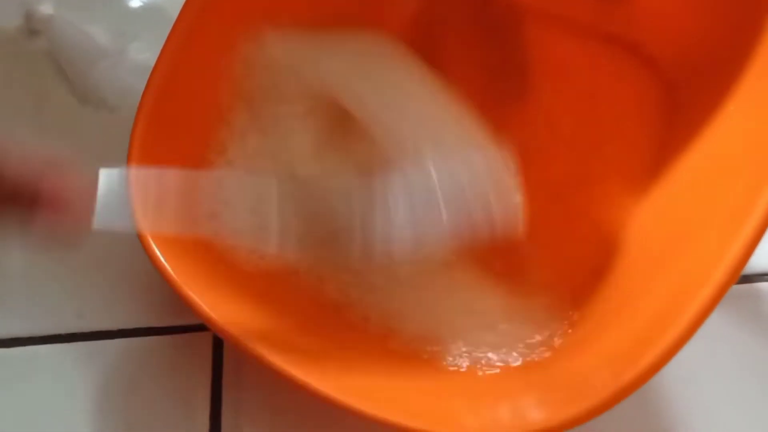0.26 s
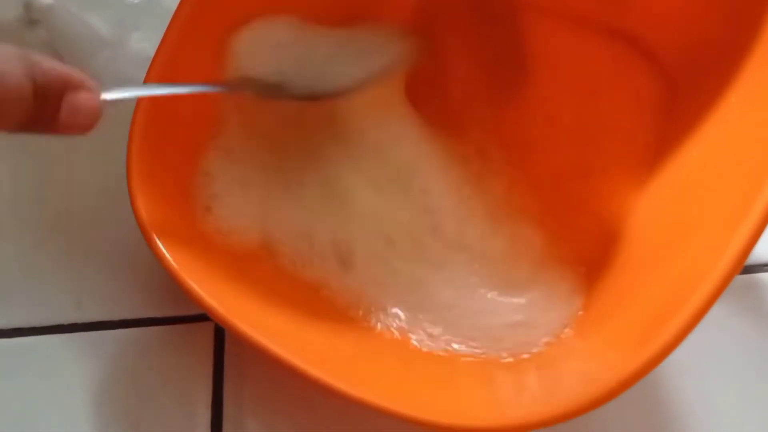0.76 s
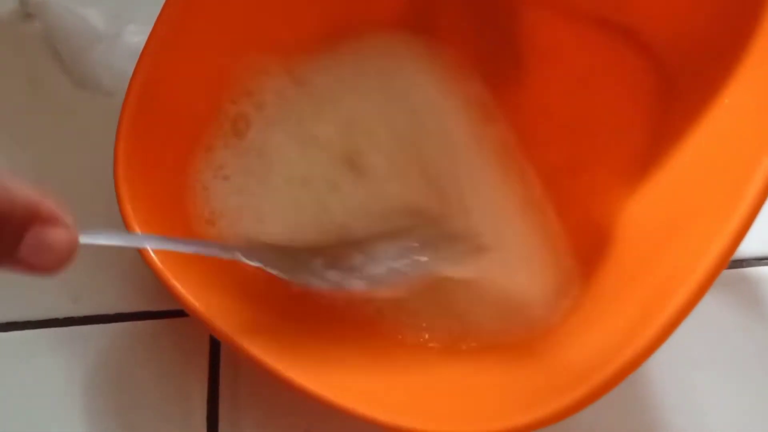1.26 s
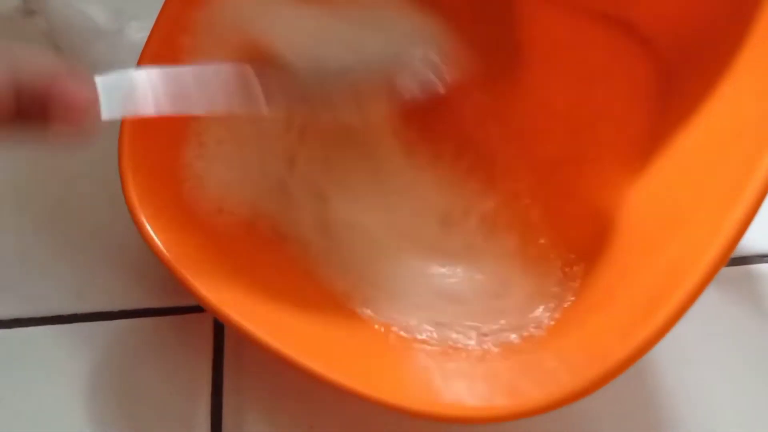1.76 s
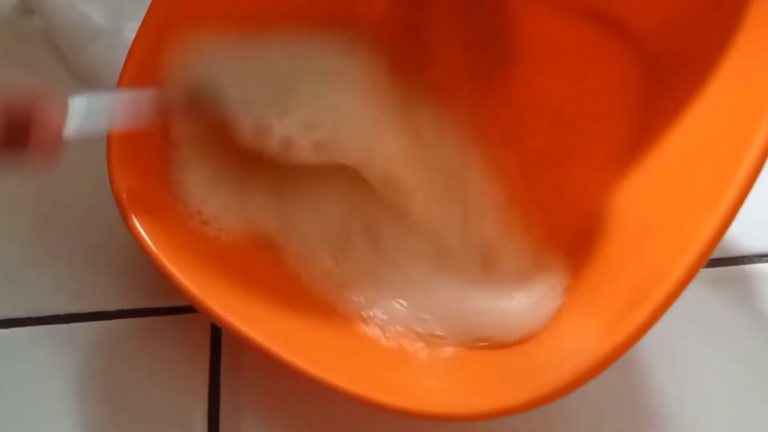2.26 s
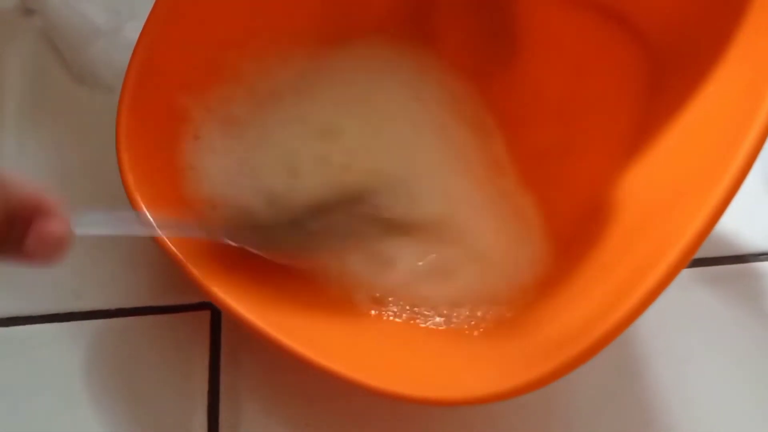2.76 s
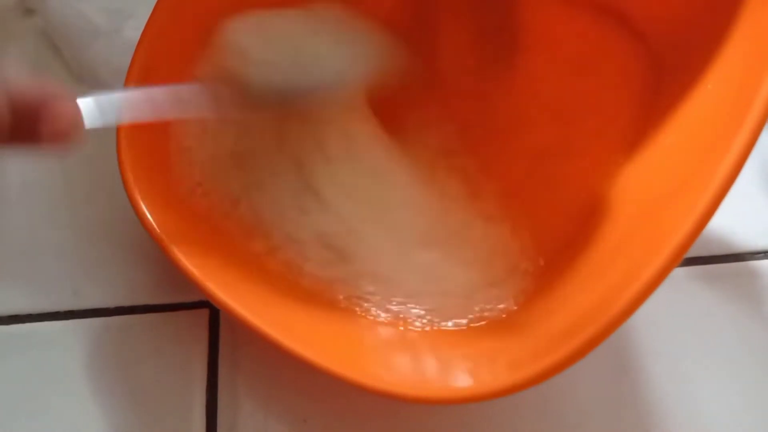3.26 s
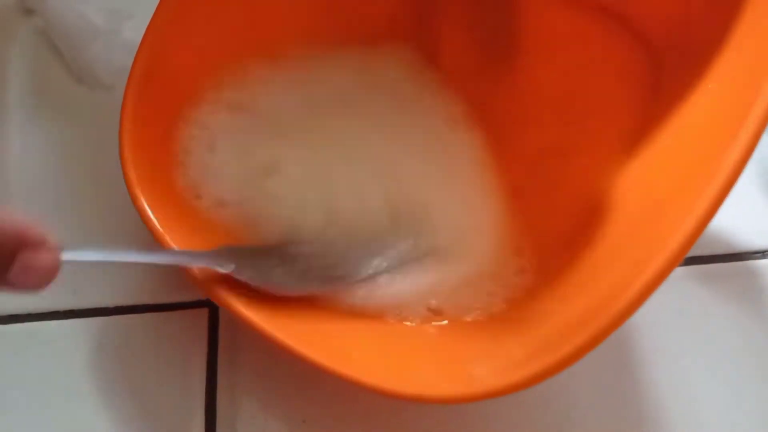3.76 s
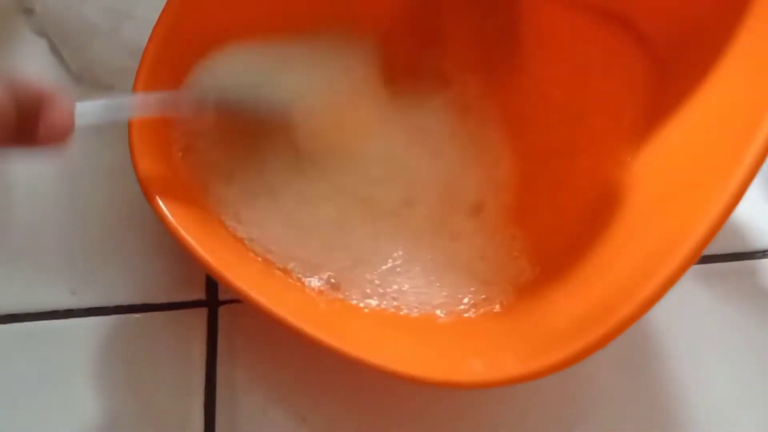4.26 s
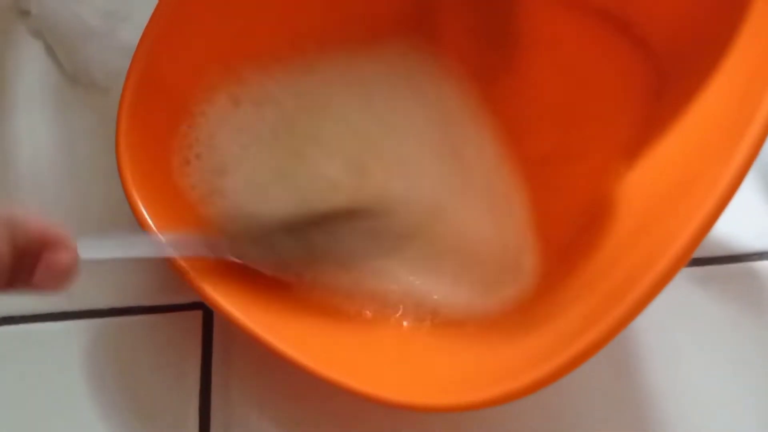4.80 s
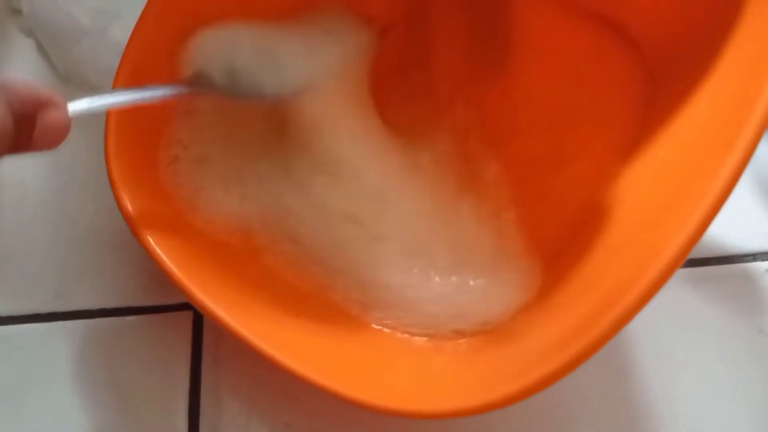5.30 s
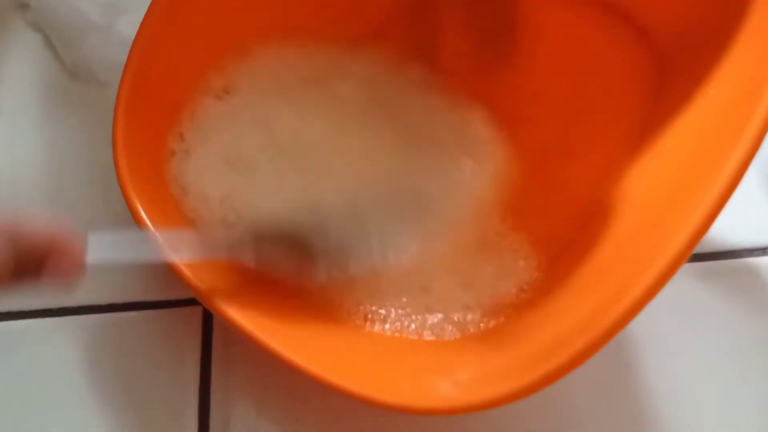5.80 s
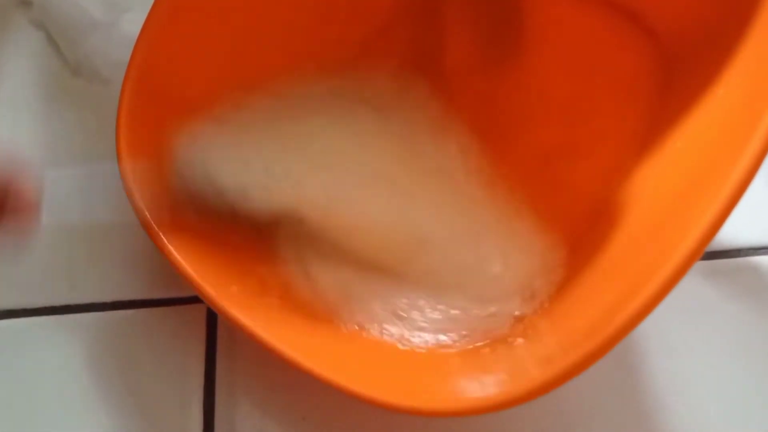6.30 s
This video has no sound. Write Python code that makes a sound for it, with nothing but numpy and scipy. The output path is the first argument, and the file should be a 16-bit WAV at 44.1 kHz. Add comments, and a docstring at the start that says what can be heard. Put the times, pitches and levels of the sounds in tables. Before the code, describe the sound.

A metal fork rapidly whisks thin batter in a plastic bowl, clacking, scraping and squeaking about five times a second over a faint hum.

```python
"""In a small tiled kitchen, a fork whisks thin batter in a tilted plastic bowl, about five strokes a second.
Blows and bounces excite the modes of wall and tines; dragging tines scrape by random catches and squeaking slips.
Batter closes air pockets with plops and spray, and froth bubbles burst as rising chirps.
Sparse decaying echoes follow over an appliance's filtered-noise rumble, wavering hum and two faint gliding tones.
Heard close up, with little deep bass and hardly any of the highest treble."""
import sys
import numpy as np
from scipy import signal
from scipy.io import wavfile
from scipy.ndimage import uniform_filter1d

SR = 44100
rng = np.random.default_rng(int(sys.argv[2]) if len(sys.argv) > 2 else 0)


def master_out(mix):
    """Clip the mix to full scale and print it as 16-bit PCM to the path in sys.argv[1]."""
    frames = np.transpose(np.atleast_2d(mix))
    ceiling = np.clip(frames, -1, 1)
    pcm = np.round(ceiling * 32767).astype(np.int16)
    wavfile.write(sys.argv[1], SR, pcm)


N = 288414

# modes of the bowl's wall, nominal before detuning and damping: (f/Hz, relative level/dB, t60/s)
WALL_MODES = [(306, -28, 0.026), (891, -13.5, 0.017), (1150, -3, .02), (1527, 1, 0.0086),
              (1702, -3.5, 0.013), (2014, -14, 0.034)]


def knock(peak_db, chance):
    """Modal excitation: the spot struck shifts pitch and balance; the resting tines damp the wall."""
    count = len(WALL_MODES)
    detune = 1 + 0.032 * chance[:count, None]
    modes = [(hz, db + 0.37 * c, t60) for (hz, db, t60), c in zip(WALL_MODES, chance[count:])]
    contact = signal.windows.hann(13)  # the blow is a short soft push
    return gain_of(peak_db) * peaked(np.convolve(ring(modes, detune, damping=1.0), contact))


# modes of the tines and the rim under them, nominal as above: (f/Hz, relative level/dB, t60/s)
TINE_MODES = [(2346, -30, 0.13), (2934, -16, 0.048), (3473, -9.5, 0.015), (3917, -5.5, 0.011),
              (4965, 1.5, 0.0066), (5740, 1.5, 0.0061), (6680, 0.5, 0.0091), (7287, 2, 0.0066),
              (8840, -5.5, 0.0035), (10320, -11, 0.0025), (13400, -18, 0.003), (15600, -11, 0.0038)]
# strokes: (t/s, wall knock peak level/dB, tine tick peak level/dB, relative drag level/dB, time to lift-off/s)
STROKES = [(0.0, -22.5, -21.5, -32.5, 0.058), (0.1664, -10.5, -13.5, -33, 0.077),
           (0.3437, -16, -13, -46, 0.062), (0.5345, -13, -13.5, -35.5, 0.069),
           (0.7168, -10, -13, -35.5, 0.084), (0.895, -11, -12.5, -34, 0.059),
           (1.0949, -11, -14, -31.5, 0.065), (1.29, -10.5, -12, -31, 0.076),
           (1.4772, -11.5, -12.5, -37.5, 0.09), (1.6707, -13, -8, -37, 0.09),
           (1.864, -14, -10.5, -35.5, 0.079), (2.0522, -14, -13.5, -33, 0.066),
           (2.24, -12, -10.5, -33.5, 0.084), (2.4256, -11.5, -13, -29.5, 0.047),
           (2.6046, -10.5, -12.5, -35.5, .098), (2.7979, -11, -13, -38.5, 0.098),
           (2.9936, -14, -16, -38, 0.068), (3.1817, -20, -20.5, -41, 0.073),
           (3.3915, -16, -16.5, -39.5, 0.088), (3.5917, -17.5, -13.5, -37.5, 0.073),
           (3.7872, -24, -9.5, -34, 0.076), (3.9918, -18.5, -17.5, -45.5, 0.05),
           (4.1838, -22.5, -19.5, -47.5, 0.13), (4.4016, -15, -16, -37, 0.056),
           (4.602, -15, -15.5, -34.5, 0.083), (4.82, -14, -19.5, -28, 0.06),
           (5.0036, -16.5, -20, -40.5, 0.11), (5.2283, -19, -19, -36.5, 0.12),
           (5.447, -22.5, -20.5, -40, .11), (5.6679, -22, -21, -39, 0.09),
           (5.8811, -26.5, -19.5, -54, 0.049), (6.0841, -35, -25.5, -37.5, 0.086),
           (6.2832, -49, -20.5, -26.5, 0.032), (6.4789, -16, -15, -26, 0.056)]
# bounces of the fork on the wall: (t/s, peak level/dB)
BOUNCES = [(0.0065, -26.5), (0.3652, -31), (0.554, -27), (0.736, -36), (1.1005, -18), (1.3085, -29),
           (1.6992, -25), (1.8795, -21), (2.2515, -23.5), (2.4442, -35), (2.8153, -30), (3.0315, -35),
           (3.2065, -30.5), (3.413, -29), (3.6265, -29.8), (3.8006, -23.5), (4.0548, -29.5), (4.2284, -30),
           (4.4193, -30), (4.841, -24.5), (5.026, -31), (5.039, -33), (5.2804, -34), (5.485, -32),
           (5.8986, -35), (6.3039, -30.5)]


def blows():
    """Impact excitation: a wall knock, and a tick from random clicks of metal within milliseconds."""
    out, t = np.zeros(N), np.arange(300) / SR
    count = 2 * len(WALL_MODES)
    chances = rng.standard_normal((len(STROKES), count + 300))
    for (s, wall_db, tick_db, *_), chance in zip(STROKES, chances):
        add(out, s, knock(wall_db, chance[:count]))
        clicks = chance[count:]
        decay = gain_of(-60 * t / .014) * np.clip(t / .0004, 0, 1)
        landing = clicks * (abs(clicks) > 1.3) * decay
        tick = peaked(np.convolve(landing, ring(TINE_MODES, damping=1.68)))
        add(out, s - .0002, gain_of(tick_db) * tick)
    for (s, db), chance in zip(BOUNCES, rng.standard_normal((len(BOUNCES), count))):
        add(out, s, knock(db, chance))
    return out


def grit(size, per_s=9000, spread_db=4.0):
    """Asperity contact: tiny catches of steel on plastic as random clicks, a few of them large."""
    height = gain_of(spread_db * np.minimum(rng.exponential(1, size), 4))
    height = height * rng.choice([-1, 1], size)
    return evened(height * (rng.random(size) < per_s / SR))


def rubbed(force, modes, patchy_db=5.5):
    """Friction excitation: the contact wanders, so each mode has its own catches and comes and goes."""
    out = np.zeros(N)
    energy = np.array([gain_of(2 * db) * t60 for _, db, t60 in modes])
    for mode, share in zip(modes, np.sqrt(energy / energy.sum())):
        wander = gain_of(patchy_db * evened(uniform_filter1d(rng.standard_normal(N), 450)))
        catches = evened(wander * grit(N))
        out += share * signal.oaconvolve(force * catches, ring([mode]))[:N]
    return out


# slips of the dragging tines: (t/s, relative push level/dB, length/s, nominal squeak f/Hz)
SLIPS = [(0.191, -36, .017, 7100), (0.336, -35, 0.07, 7300), (0.397, -30.5, 0.024, 6980),
         (0.548, -33.5, 0.017, 7200), (0.588, -31.5, 0.016, 4680), (0.724, -37, .048, 6800),
         (0.765, -35.5, 0.014, 4700), (0.915, -35, 0.012, 5230), (0.94, -35, 0.042, 6940),
         (1.153, -30.5, 0.016, 7020), (1.322, -25.5, 0.015, 6200), (1.485, -31, 0.02, 7100),
         (1.512, -34, 0.019, 5000), (1.533, -32.5, 0.021, 7000), (1.686, -38, 0.018, 4800),
         (1.705, -28.5, 0.027, 5200), (1.7335, -29.5, .017, 4900), (1.9063, -31.5, 0.021, 6440),
         (1.9257, -31, 0.03, 6860), (2.088, -27.5, 0.032, 5930), (2.112, -28, .022, 6780),
         (2.2697, -23.5, 0.02, 5730), (2.45, -27, 0.041, 6070), (2.492, -34, 0.017, 5370),
         (2.623, -23.5, 0.025, 5740), (2.672, -36.5, 0.026, 5460), (2.8153, -26, 0.03, 5550),
         (2.857, -31.5, 0.027, 6800), (3.0223, -28, 0.028, 5320), (3.0623, -32, 0.031, 6950),
         (3.08, -38, .011, 7000), (3.2364, -32.5, .046, 6800), (3.4393, -35.5, 0.037, 6630),
         (3.622, -26, 0.039, 5650), (3.813, -34, 0.04, 5150), (4.017, -29, 0.048, 5440),
         (4.07, -38, 0.017, 6880), (4.226, -30, 0.029, 5170), (4.254, -46, 0.014, 4700),
         (4.444, -31.5, 0.028, 3320), (4.4697, -32.5, 0.021, 5440), (4.479, -34, 0.0068, 3050),
         (4.638, -29, 0.024, 3590), (4.6795, -28, 0.019, 5630), (4.871, -31.5, 0.012, 6350),
         (4.89, -38, 0.018, 6640), (5.043, -27.5, 0.038, 6270), (5.104, -34.5, 0.018, 6920),
         (5.264, -25, 0.037, 6680), (5.4752, -24.5, 0.039, 5470), (5.508, -29.5, 0.014, 6040),
         (5.692, -29, .049, 5870), (5.899, -28, 0.032, 5840), (5.92, -32.5, 0.029, 6450),
         (5.94, -27, .014, 5900), (6.098, -27, 0.0085, 4770), (6.1123, -27.5, 0.035, 5820),
         (6.127, -24, .012, 5830), (6.2966, -32, 0.066, 6870), (6.3, -28, .02, 4830)]
# drifting colour of the scrape: (t/s, lower tine modes level/dB, upper tine modes level/dB), against the middle
COLOUR = [(0, -6.5, -17), (.6, -27, -19), (1.3, -8.5, -25), (2.2, -19, -19), (3.0, -6, -15.5),
          (3.8, -10.5, -16.5), (4.8, -7, -14), (5.3, -30, -14.5), (6.5, -21, -14)]
# wall chatter: relative dB for a full-scale knock, share of the knock's dB followed, t60 in s, drift in dB/s
CHATTER_DB, CHATTER_SHARE, CHATTER_T60, CHATTER_DB_PER_S = -35.5, 0.24, 0.2, 0.34
SLIP_RISE, SLIP_FADE_DB, SLIP_END_S = .38, 10, 0.0085  # share of length rising, dB lost over length, let-go
TINES_LOW_HZ = 890  # tines and bubbles sound only above this


def scrape():
    """Stick-slip friction: catches ring the tines, the wall chatters after each blow, each slip squeaks."""
    drag, slip, chatter, squeak = np.zeros((4, N))
    catches = grit(N)
    for s, wall_db, _, drag_db, lift in STROKES:
        t = np.arange(0, lift, 1 / SR)
        touch = np.clip(t / 0.0019, 0, 1) * np.clip((lift - t) / 0.015, 0, 1)
        add(drag, s, gain_of(drag_db) * touch)
        chatter_db = CHATTER_DB + CHATTER_SHARE * wall_db + CHATTER_DB_PER_S * s - 60 * t / CHATTER_T60
        add(chatter, s, gain_of(chatter_db) * touch)
    for s, db, length, hz in SLIPS:
        t = np.arange(0, length, 1 / SR)
        edges = np.clip(t / (SLIP_RISE * length), 0, 1) * np.clip((length - t) / SLIP_END_S, 0, 1)
        push = gain_of(db - SLIP_FADE_DB * (t / length - SLIP_RISE)) * edges
        add(slip, s - .002, push)
        at = round(s * SR)
        add(squeak, s - .002, np.convolve(push * catches[at:at + len(t)], ring([(hz, 0, .009)])))

    s, lower_db, upper_db = np.transpose(COLOUR)
    now = np.arange(N) / SR
    lower_db, upper_db = np.interp(now, s, lower_db), np.interp(now, s, upper_db)
    top_db = -16.5 - .9 * now  # the thickening froth muffles the top mode more and more
    force = drag + slip
    lower = rubbed(force * gain_of(lower_db), TINE_MODES[:4])
    middle = rubbed(force, TINE_MODES[4:8])
    upper = rubbed(force * gain_of(upper_db), TINE_MODES[8:11])
    top = rubbed((drag + 0.62 * slip) * gain_of(top_db), TINE_MODES[11:])  # slips reach it less

    wall_drive = chatter * grit(N, per_s=1500) + 0.03 * force * catches
    wall = signal.oaconvolve(wall_drive, ring(WALL_MODES))[:N]
    small = gain_of(-6.0) * (lower + middle + upper + top)
    small += gain_of(-5.0) * squeak + gain_of(-22.5) * foam(force)
    return wall + signal.sosfilt(signal.butter(3, TINES_LOW_HZ, "high", fs=SR, output="sos"), small)


# batter against the wall: (t/s, plop peak level/dB, starting cavity f/Hz, loss per swing at that pitch/dB)
SLOPS = [(0.133, -39, 860, 9), (0.144, -43, 1800, 15), (0.334, -38, 1000, 14), (0.508, -49, 1260, 15),
         (0.514, -39, 1240, 28), (0.697, -31, 790, 26), (0.704, -40, 1140, 24), (0.879, -47.5, 1210, 12),
         (1.205, -54, 3100, 5), (1.058, -53, 1530, -3), (1.076, -49, 1490, 3), (1.262, -50, 1200, 7),
         (1.269, -37.5, 1320, 17), (1.453, -49, 830, 2), (1.458, -37, 1400, 21), (1.626, -53, 1160, 7),
         (1.653, -32.5, 790, 10), (1.84, -41, 550, 9), (1.849, -32, 734, 7), (2.025, -39, 790, 4),
         (2.036, -33.5, 753, 4), (2.218, -32.5, 880, 15), (2.409, -37, 1010, 22), (2.466, -47, 300, 12),
         (2.583, -34, 690, 15), (2.783, -31.5, 430, 20), (2.785, -37, 1150, 13), (2.975, -36, 770, 14),
         (3.34, -36, 740, 11), (3.786, -29.5, 723, 1.5), (3.786, -33, 384, 5.5), (4.053, -26, 848, 3),
         (4.159, -36.5, 810, 15), (4.376, -39, 840, 23), (4.385, -39, 1160, 18), (4.526, -49.5, 3000, 2),
         (4.57, -35, 880, 21), (4.779, -48, 1440, 16), (4.964, -41.5, 396, 10), (4.981, -40.5, 315, 34),
         (5.015, -50, 249, 9), (5.186, -48, 1200, 17), (5.207, -47.5, 560, 14), (5.293, -51, 360, 4),
         (5.369, -51, 600, 18), (5.386, -50.5, 1400, 36), (5.61, -46, 300, 12), (5.63, -40.5, 453, 18),
         (6.282, -35, 744, 3.5), (6.451, -32, 503, 28)]
# drive levels against the plop, before ringing; small, high pockets spray more
SPRAY_DB, SPRAY_DB_PER_OCTAVE, WALL_SLAP_DB = -3, 3, -8


def slops():
    """Cavity resonance: a closing air pocket plops with rising pitch, throws spray and slaps the wall."""
    out, t = np.zeros(N), np.arange(900) / SR
    for (s, db, hz, loss_db), noise in zip(SLOPS, rng.standard_normal((len(SLOPS), 900))):
        swing = np.sin(2 * np.pi * hz * t * (1 + 6 * t))
        plop = swing * gain_of(-loss_db * hz * t) * np.clip(t / 0.0021, 0, 1)
        puff = noise * gain_of(-60 * t / 0.023) * np.clip(t / 0.00017, 0, 1)
        spray_db = db + SPRAY_DB + SPRAY_DB_PER_OCTAVE * np.log2(hz / 800)
        add(out, s, gain_of(db) * peaked(plop))
        add(out, s, gain_of(spray_db) * np.convolve(puff, ring(TINE_MODES, damping=4.8)))
        add(out, s, gain_of(db + WALL_SLAP_DB) * np.convolve(puff, ring(WALL_MODES, damping=1.4)))
    return out


def foam(stir):
    """Bubble resonance: stirred froth bursts in rising chirps, more as it builds up, and lingers a little."""
    linger = signal.lfilter([.0009], [1, -(1 - .0009)], stir)
    froth = gain_of(0.44 * np.arange(N) / SR) * (stir + 0.15 * linger)
    out, t = np.zeros(N), np.arange(400) / SR
    for hz in np.geomspace(2000, 7500, 24):
        swing = np.sin(2 * np.pi * hz * t * (1 + 5 * t))
        chirp = swing * gain_of(-1.1 * hz * t) * np.clip(t / 0.00062, 0, 1)
        weight = np.exp(-np.log(hz / 5200) ** 2 / 0.52)  # bubbles of middle size are strongest
        bursts = grit(N, per_s=40, spread_db=3.6)
        out += weight * signal.oaconvolve(froth * bursts, chirp / np.linalg.norm(chirp))[:N]
    return out


# reverberation of the room: (f/Hz, t60/s)
KITCHEN_DECAY = [(300, 0.25), (1300, 0.18), (3500, 0.21), (6000, 0.26), (9000, 0.16), (15000, 0.2)]


def kitchen(x):
    """Reverberation: sparse echoes of random sign, each band dying at its own rate; three tails take turns."""
    size, out = SR // 2, np.zeros(N)
    for k in range(3):
        taps = np.zeros(size)
        at = np.arange(180, size - 12, 12)
        taps[at + rng.integers(0, 12, len(at))] = rng.choice([-1., 1.], len(at))
        hz, t, z = signal.stft(taps, SR, nperseg=128)
        decay = gain_of(-60 * t / read(KITCHEN_DECAY, hz)[:, None])
        tail = signal.istft(z * decay, SR, nperseg=128)[1]
        turn = np.sqrt(2 / 3) * np.cos(2 * np.pi * (np.arange(N) / SR * 1.4 + k / 3))
        out += signal.oaconvolve(x * turn, tail / np.linalg.norm(tail))[:N]
    return out


# spectral density of the appliance's rumble: (f/Hz, relative level per Hz/dB)
RUMBLE_SPECTRUM = [(25, -8), (60, -14), (100, 0.5), (200, 1.5), (320, -6), (480, -2), (600, -58),
                   (750, -1.5), (900, -11.5), (1900, -15), (2150, -7.5), (2600, -20.5), (5800, -17),
                   (10000, -40), (16000, -45)]
RUMBLE_DB = -61  # rms
# wavering tones of the appliance: (mean f/Hz, nominal rms level/dB, rms wavering f/Hz)
HUM_TONES = [(65.7, -75, 4.5), (102.2, -72.5, 4.04), (536, -66, 2.06), (2180, -78, 7.6), (2320, -76.5, 11)]


def appliance():
    """Spectral shaping and frequency modulation: rumble noise with drifting patches, and wavering tones."""
    frames, hz = N // 512 + 5, np.fft.rfftfreq(2048, 1 / SR)
    real, imaginary, patches = rng.standard_normal((frames, 1025, 3)).T
    patches = evened(uniform_filter1d(uniform_filter1d(patches, 5, 0), 8, 1))
    swell = evened(uniform_filter1d(rng.standard_normal(frames), 14))
    level_db = read(RUMBLE_SPECTRUM, hz)[:, None] + 3 * patches + 1.5 * swell
    z = (real + 1j * imaginary) * gain_of(level_db)
    out = gain_of(RUMBLE_DB) * evened(signal.istft(z, nperseg=2048, noverlap=1536)[1][:N])
    for hz, db, waver_hz in HUM_TONES:
        drift = evened(uniform_filter1d(rng.standard_normal(N), 3000))
        phase = 2 * np.pi * np.cumsum(hz + waver_hz * drift) / SR
        out += np.sqrt(2) * gain_of(db + 0.26 * drift) * np.sin(phase)
    return out


# faint gliding tones: (t/s, length/s, start f/Hz, end f/Hz, rms level before taper/dB, rms wavering f/Hz)
GLIDES = [(2.506, 0.1, 414, 453, -57.5, 25), (4.512, 0.26, 1065, 1076, -59.5, 9.3)]


def glides():
    """Frequency modulation: short gliding tones, slightly unsteady in pitch and level."""
    out = np.zeros(N)
    for s, length, from_hz, to_hz, db, waver_hz in GLIDES:
        t = np.arange(0, length, 1 / SR)
        waver = evened(uniform_filter1d(rng.standard_normal(len(t)), 500))
        hz = from_hz + (to_hz - from_hz) * t / length + waver_hz * waver
        shape = signal.windows.tukey(len(t), .4) * gain_of(db + 1.5 * waver)
        add(out, s, np.sqrt(2) * shape * np.sin(2 * np.pi * np.cumsum(hz) / SR))
    return out


def ring(modes, detune=0.98, damping=0.66):
    """Modal superposition: the unit-energy answer to one click; neighbours swing in opposite phase."""
    t = np.arange(2048) / SR
    hz, db, t60 = np.transpose(modes)[:, :, None]
    sign = (-1.) ** np.arange(len(modes))[:, None]
    decay = gain_of(db - 60 * t * damping / t60)
    wave = (sign * decay * np.sin(2 * np.pi * hz * detune * t)).sum(0)
    return wave / np.linalg.norm(wave)


def gain_of(db):
    """Logarithmic level: decibels to amplitude."""
    return 10 ** (np.asarray(db) / 20)


def evened(x):
    """Power normalisation: scales to rms 1."""
    return x / np.sqrt(np.mean(x ** 2) + 1e-20)


def peaked(x):
    """Peak normalisation: scales to peak 1."""
    return x / abs(x).max()


def read(points, hz):
    """Interpolation: reads a table on a log-frequency axis."""
    f, value = np.transpose(points)
    return np.interp(np.log(hz + 1), np.log(f + 1), value)


def add(mix, s, sound):
    """Superposition: mixes a sound in at s seconds."""
    part = mix[max(round(s * SR), 0):][:len(sound)]
    part += sound[:len(part)]


def scene():
    """Superposition: direct and reverberant bowl over the background, the same in both channels."""
    bowl = blows() + scrape() + slops()
    mix = bowl + gain_of(-11.0) * kitchen(bowl) + appliance() + glides()
    return np.tile(mix, (2, 1))


CUT_HZ, EDGE_HZ = 64, 17100  # bass cut, upper band limit
SHELF_HZ, SHELF_DB = 15950, -31  # above this the treble is much fainter


def record(dry):
    """Linear filtering: bass cut, a steep treble step down, then the band limit."""
    thin = signal.sosfilt(signal.butter(2, CUT_HZ, "high", fs=SR, output="sos"), dry)
    low = gain_of(SHELF_DB)
    shelf = signal.firwin2(255, [0, SHELF_HZ, SHELF_HZ + 250, SR / 2], [1, 1, low, low], fs=SR)
    edge = signal.firwin(255, EDGE_HZ, window=("kaiser", 7), fs=SR)
    return signal.oaconvolve(thin, np.convolve(shelf, edge)[None], "same")


dry = scene()
out = record(dry)
master_out(out)
```